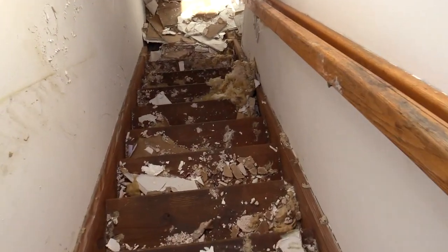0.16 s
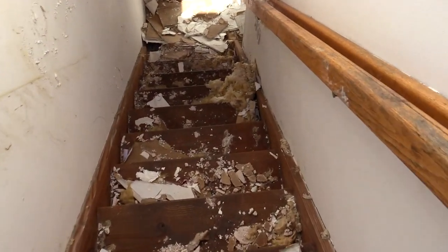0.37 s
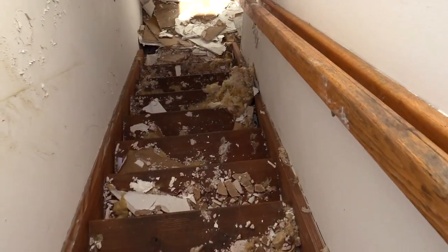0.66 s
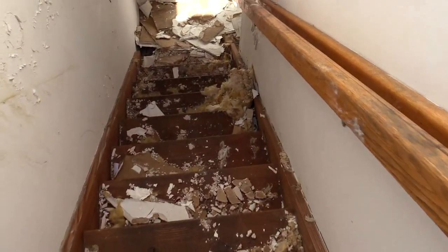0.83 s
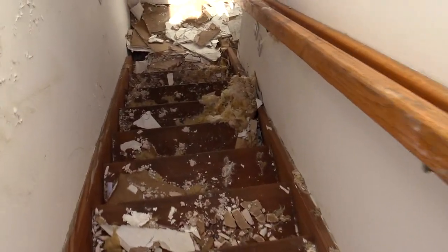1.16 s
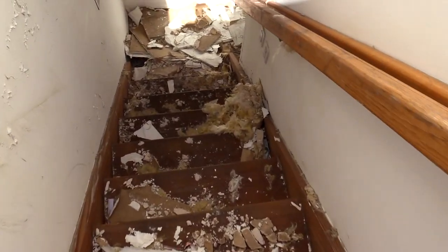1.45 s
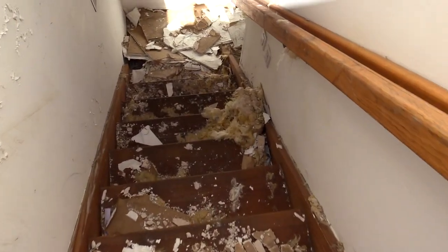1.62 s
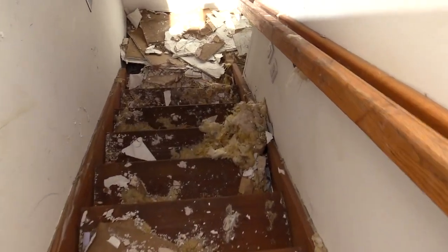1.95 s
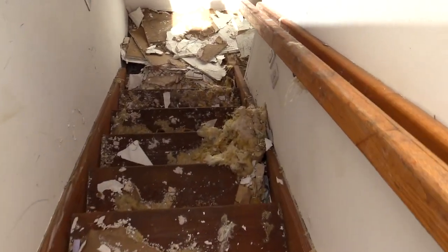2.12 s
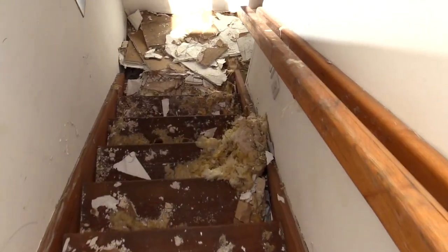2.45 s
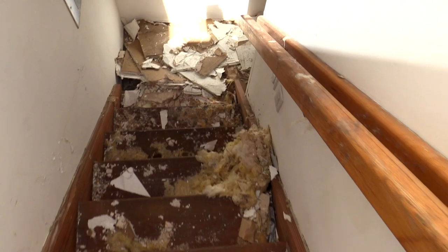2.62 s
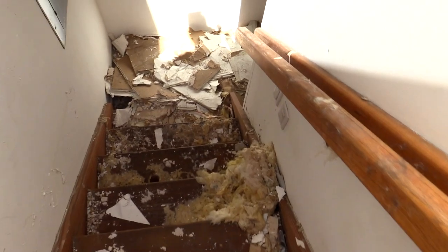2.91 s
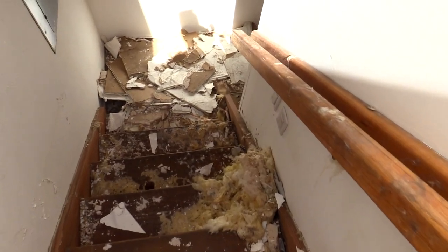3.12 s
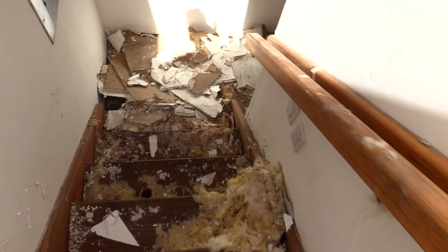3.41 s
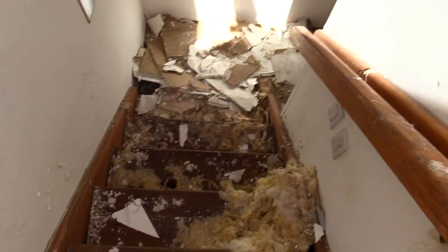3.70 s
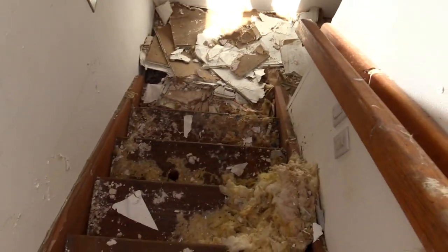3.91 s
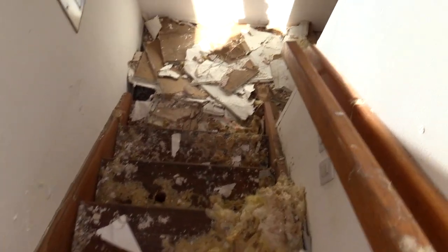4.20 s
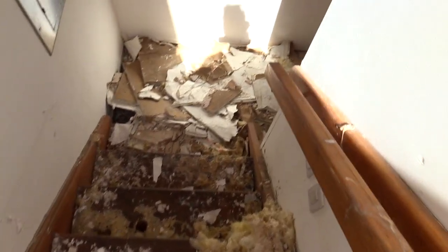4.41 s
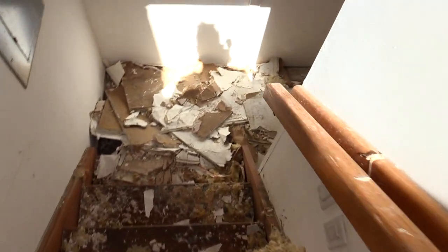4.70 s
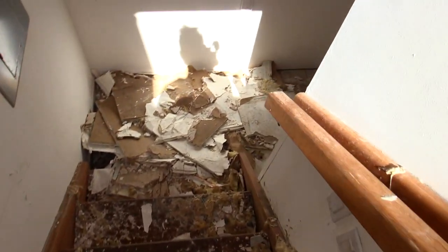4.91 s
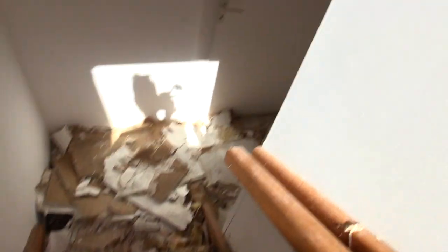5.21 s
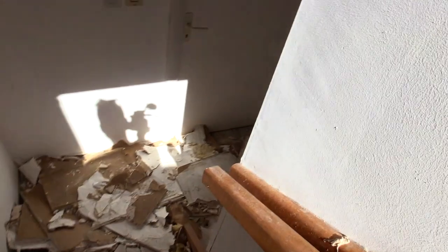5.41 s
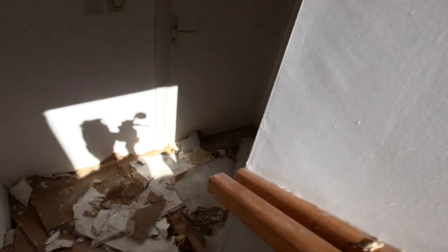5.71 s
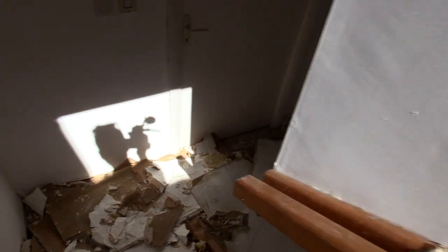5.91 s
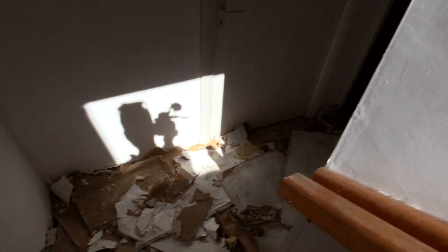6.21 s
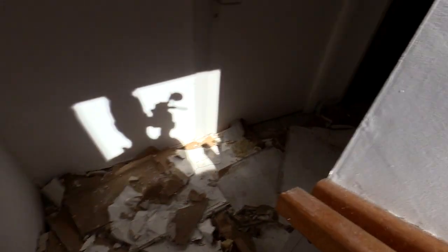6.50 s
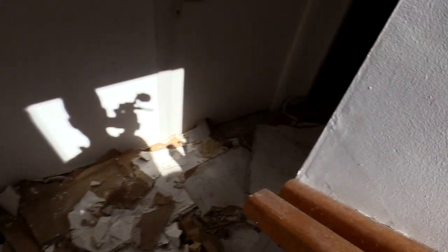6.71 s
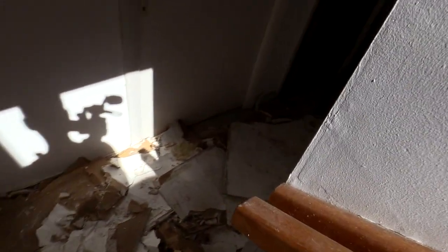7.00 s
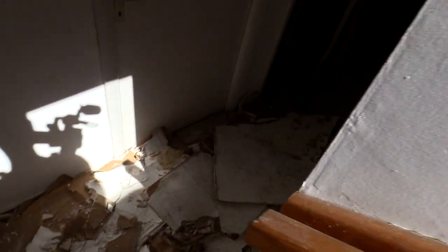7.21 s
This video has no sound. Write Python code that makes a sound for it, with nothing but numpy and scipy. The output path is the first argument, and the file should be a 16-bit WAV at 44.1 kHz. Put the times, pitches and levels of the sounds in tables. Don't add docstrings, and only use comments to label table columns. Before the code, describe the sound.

Someone treads along a wrecked wooden staircase, boards cracking sharply underfoot, crumbs crushing and shards clinking in a bare, echoing stairwell.

```python
import sys
import numpy as np
from scipy import signal
from scipy.io import wavfile
from scipy.ndimage import uniform_filter1d

SR = 44100
rng = np.random.default_rng(int(sys.argv[2]) if len(sys.argv) > 2 else 0)


def file_out(sig):
    cols = np.atleast_2d(sig).T
    lim = np.clip(cols, -1, 1)
    pcm = np.round(lim * 32767).astype(np.int16)
    wavfile.write(sys.argv[1], SR, pcm)


def decibels_to_gain(level_db):
    exponent = np.asarray(level_db, float) / 20
    return 10 ** exponent


N = 324135
STEP = 32

# frequency in Hz, level in dB per Hz.
TONE = [(35, -25), (60, -7.5), (121, -35.5), (168, 1), (371, -5), (448, -10.5), (636, -8), (682, -11.5),
        (1780, -21.5), (2470, -25.5), (11800, -37), (12700, -38.5), (16000, -35.5)]
TONE_DB = -56
# frequency in Hz, rms level in dB.
WHINES = [(4748, -86), (5216, -87), (5992, -85), (7434, -87), (8150, -89), (8931, -90), (11149, -88),
          (12947, -83), (13006, -82)]
WAVER = .0003

# time in seconds, level in dB.
DRAUGHT = [
    (0, -53),
    (1.2, -57),
    (2.5, -50),
    (3.0, -75),
    (3.6, -60.5),
    (5.001, -62),
    (7.35, -57),
]
# time in seconds, peak in dB, hold in seconds.
GUSTS = [(0, -27.5, 0.0089), (0.21, -30.5, .01), (0.365, -33.5, 0.0099), (.53, -40, 0.098),
         (0.704, -40, 0.14), (1.12, -37.5, 0.12), (1.98, -40.5, 0.055), (2.17, -43.5, 0.072),
         (2.546, -49.5, .06), (2.674, -42.5, .01), (3.204, -43, 0.078), (3.52, -46.5, 0.025),
         (4.861, -56, 0.14), (5.635, -54, .01), (5.759, -47, .01), (6.633, -56.5, 0.096)]
GUST_DB_PER_S, THUMP_FLOOR_DB = 160.5, -53.5
# time in seconds, peak in dB.
JOLTS = [(0.039, -28), (.4, -33), (0.528, -36), (.69, -36), (1.06, -29.5), (1.18, -35.5), (1.31, -40.5),
         (1.821, -33), (1.95, -33.5), (2.14, -36), (2.603, -33), (2.68, -32.5), (2.799, -25.5),
         (3.15, -35.5), (3.461, -35), (3.79, -48), (4.05, -43), (4.361, -37.5), (5.099, -46), (5.57, -40),
         (5.711, -48), (6.04, -35.5), (6.428, -42.5), (7.211, -40)]
JOLT_RISE_DB_PER_S, JOLT_FALL_DB_PER_S = 448.5, 219.5

# time in seconds, hold in seconds, level in dB, centre in Hz.
RUSTLES = [
    (1.552, 0.033, -73, 5800),
    (4.185, 0.066, -61.5, 2800),
    (4.69, .025, -52, 3370),
    (5.152, 0.017, -60.5, 5330),
    (5.77, 0.021, -72, 5500),
]

# frequency in Hz, t60 in seconds.
STAIRWELL = [(120, 0.58), (400, 0.49), (1000, 0.47), (2500, 0.38), (6000, 0.41), (12000, 0.29)]

# time of full weight in seconds, load in seconds,
# release in seconds, level in dB, fine dust in dB.
GRIND = [(0.413, 0.011, 0.1, -43.5, -6.5), (0.514, 0.0057, 0.059, -54, 13.5),
         (1.172, 0.041, 0.031, -46, 1.5), (1.304, 0.076, 0.034, -51.5, -5), (1.88, 0.02, 0.14, -43, 3.5),
         (2.036, 0.19, 0.037, -38.5, -23), (2.09, 0.059, 0.048, -62, 8.5), (2.774, 0.17, 0.047, -47.5, 1),
         (3.695, 0.047, 0.067, -51.5, -25), (3.95, 0.44, 0.45, -52, -10), (4.391, 0.0088, 0.037, -48, 0),
         (4.48, 0.08, 0.024, -52, -1), (4.703, 0.14, 0.034, -52.5, 3), (4.74, 0.024, 0.014, -42.5, -13),
         (5.15, 0.042, 0.044, -56, -5), (5.541, 0.033, 0.04, -50, -12), (6.12, 0.15, 0.24, -65, 3.5),
         (6.42, 0.23, 0.13, -47, -31), (6.924, 0.086, 0.26, -63, -3.5), (7.15, 0.1, .015, -57, -5)]
PRESS_DROP_DB = 20

# start in seconds, peak in dB, centre in Hz, t60 in seconds.
CRUMBS = [(1.064, -43, 3000, 0.044), (1.124, -46, 2200, .04), (1.14, -44, 7000, .02),
          (1.21, -54, 2500, 0.046), (1.31, -54, 2200, .04), (1.871, -39, 7800, .04),
          (1.879, -33, 5000, .03), (1.899, -32, 8500, .04), (1.905, -33, 7500, 0.046),
          (1.975, -42, 2000, .1), (2.045, -32.5, 1500, 0.13), (2.07, -40, 7900, 0.026),
          (2.653, -46, 2500, 0.099), (2.657, -53, 5200, .03), (2.671, -45, 4800, 0.056),
          (2.699, -34, 3020, 0.054), (2.718, -32.5, 6850, .03), (2.738, -46, 8000, .02),
          (2.758, -46, 9000, .02), (2.771, -38, 8000, .02), (2.791, -39, 7500, .02),
          (3.752, -41, 2000, 0.037), (3.82, -35, 1200, .05), (3.888, -38, 1300, 0.032),
          (3.929, -41, 3300, .05), (6.084, -46, 6800, 0.034), (6.196, -51, 3000, .03),
          (6.239, -38, 2980, 0.036), (6.317, -48, 5500, 0.043), (6.345, -46, 3000, .04),
          (6.372, -50, 5000, .04), (6.399, -53, 5000, .04), (6.417, -44, 2200, .03),
          (7.224, -30, 1470, 0.26), (7.311, -28.5, 2300, 0.033), (4.3747, -32.5, 5500, 0.039),
          (4.441, -41.5, 5000, .015), (4.4725, -45, 6000, 0.012), (4.786, -36, 1600, .03),
          (6.131, -46.5, 7010, 0.045), (6.25, -48, 3100, .2)]
CRUMB_WIDTH, CRUMB_RISE_S = 1.3, .0006

# start in seconds, peak in dB, tread pitch in Hz,
# knock of the upper wood modes in dB, ring t60 in seconds.
HEELS = [(0.213, -18.5, 157, -11, 0.018), (1.05, -16.5, 260, -8, 0.014), (1.824, -21, 170, -8, 0.078),
         (2.593, -16, 322, -16, 0.022), (2.797, -17, 104.5, 2.5, 0.089), (3.435, -16.5, 128, -11.5, 0.082),
         (4.031, -29, 175, -25.5, 0.022), (4.373, -29.5, 155, 6, 0.052), (4.622, -18, 114.3, -5.5, 0.078),
         (4.75, -19, 256, -12, 0.02), (5.538, -35.5, 97.6, -15.5, 0.055), (6.029, -28, 79.1, -22.5, 0.12),
         (6.33, -23, 195, 12, 0.039), (7.084, -25, 79.35, -14.5, 0.15), (7.177, -17.5, 354, 21.5, 0.16)]
# factor on the pitch, level in dB.
TREAD = [(1, 5), (1.55, -4.5), (2.3, -5), (3.1, -6), (4.4, -5), (6.3, -3), (9.0, -6)]
# frequency in Hz, level in dB, t60 in seconds.
STRINGER = [(307, -5, 0.035), (551, -17, 0.033), (744, -30.5, 0.0627)]

# start in seconds, peak in dB, pitch in Hz, t60 in seconds.
RINGS = [(0.222, -32, 336, 0.29), (0.4545, -13, 700, 0.028), (0.455, -10.5, 860, 0.026),
         (0.464, -28, 1050, 0.069), (1.058, -24.5, 734, 0.048), (1.066, -28, 453, 0.084),
         (1.174, -15.5, 744, 0.018), (1.874, -30, 4550, 0.033), (1.885, -29, 1896, 0.08),
         (1.902, -28, 5220, 0.026), (1.947, -22.5, 1497, 0.066), (2.597, -22.5, 252, 0.15),
         (2.803, -19, 557, 0.14), (2.804, -7, 1050, 0.025), (2.806, -33.5, 449, 0.091),
         (4.377, -33.5, 836, 0.082), (4.472, -38, 635, 0.049), (4.624, -23, 572, 0.036),
         (4.63, -30, 327, 0.24), (6.331, -36.5, 752, 0.098), (6.388, -30.5, 602, 0.063),
         (6.416, -34, 1090, 0.032), (7.181, -12, 828, 0.068), (7.186, -16.5, 543.6, 0.13),
         (7.235, -38, 3380, .1), (7.182, -7.5, 350, 0.082), (7.197, -15, 372, 0.061),
         (7.218, -25, 360, .11), (7.218, -15, 530, 0.074), (7.316, -22, 410, 0.026)]
# start in seconds, peak in dB, pitch in Hz, t60 in seconds.
CLINKS = [(0.0145, -21, 3770, 0.0058), (0.021, -38, 3380, 0.018), (0.021, -34, 2400, .02),
          (0.303, -33, 690, 0.043), (0.408, -40, 1310, .02), (0.435, -33, 1300, .02),
          (0.4545, -36, 2270, .03), (0.665, -18.5, 2450, 0.011), (0.666, -27, 2880, .012),
          (0.672, -26, 2490, 0.011), (0.681, -35, 2700, .012), (0.4545, -26, 3160, 0.018),
          (1.869, -31, 3800, .015), (1.87, -33, 7160, .012), (1.878, -37, 3720, .012),
          (1.898, -28, 7000, .01), (2.03, -20.5, 3510, 0.01), (2.8045, -5, 1560, 0.024),
          (3.532, -20.5, 1940, 0.023), (4.375, -35, 4520, 0.017), (6.329, -32.5, 2400, 0.014),
          (7.1795, -10, 2386, 0.024), (2.029, -34, 6340, 0.014), (2.093, -41, 3550, 0.014),
          (2.761, -28, 2950, .015), (2.8014, 2, 2840, 0.0082), (3.438, -41, 2820, 0.013),
          (3.725, -38, 2400, 0.014), (3.73, -35, 2470, 0.023), (3.796, -17, 1270, 0.019),
          (3.807, -27, 1010, 0.026), (3.84, -32, 3960, 0.012), (3.842, -33, 2280, .015),
          (3.864, -26, 1030, 0.036), (3.878, -37, 4000, .015), (3.922, -39, 3320, 0.036),
          (4.006, -27.5, 1360, .015), (4.008, -34.5, 2300, 0.014), (4.752, -21, 4400, 0.012),
          (4.752, -17, 2370, 0.018), (4.784, -30, 1126, .03), (7.1795, -5, 2753, 0.019),
          (7.1795, -7.5, 3640, 0.014)]
CLINK_T60_MAX = .024
RINGS_TO_WALLS_DB, CLINKS_TO_WALLS_DB = -5, -16

# start in seconds, peak in dB, pitch in Hz, body in dB.
SPLINTERS = [
    (2.071, -46, 1350, -22),
    (3.1574, -41, 2580, -10),
    (3.2029, -37, 3320, -13),
    (3.7937, -47, 1150, 26),
    (4.6634, -59, 3330, -13),
]
FLAKES = [(0.0141, -29, 2940, -6.5), (0.5077, -30, 1930, -12), (0.6644, -27.5, 2480, -1),
          (1.0625, -44, 1500, 11.5), (1.1037, -44, 1180, 4), (1.2003, -34, 1790, -9),
          (1.2987, -56, 1370, 13.5), (1.5494, -60, 1560, 9), (2.27, -54.5, 1410, 12.5),
          (2.3295, -45.5, 1610, 2), (3.1365, -48, 3250, -11), (3.9888, -43.5, 1230, 6),
          (5.77, -62.5, 1630, -1.5), (1.8981, -24.5, 1770, -4), (2.7137, -29, 2200, 2)]
CHIPS = [(0.388, -49, 1250, -13), (0.492, -37, 1210, -3), (0.9675, -48, 3100, -4), (1.8264, -39, 1540, -1),
         (2.2835, -50, 1630, -20), (2.6697, -42, 1420, 6.5), (2.6922, -31, 1600, -5),
         (3.1223, -48, 2210, -5), (3.8767, -34, 1250, 0), (4.0061, -38.5, 1250, 2), (4.4732, -48, 1210, 11),
         (4.6952, -35, 3400, 1), (5.3996, -52.5, 1330, 0)]
LUMPS = [(0.4074, -38, 1330, -2), (0.5139, -29.5, 1180, -8), (0.5204, -37, 1300, -8),
         (0.5484, -38, 2420, -2), (1.1571, -31, 2070, 3), (1.1719, -33, 1670, 4),
         (2.0284, -24.5, 1550, -1.5), (2.092, -41.5, 1670, 7.5), (3.7314, -35.5, 2300, 0),
         (3.841, -27.5, 2440, 0), (3.8629, -45, 1200, 15.5), (3.922, -37, 1780, 2), (4.071, -40, 3400, 0),
         (4.4428, -39.5, 1280, -5), (6.0817, -40, 1820, -5), (6.1309, -41.5, 1210, 10),
         (6.3335, -25, 2480, -17), (6.393, -30.5, 2280, 4)]
# brittle edge in dB, splitting t60 in seconds.
SPLINTER = (5.8, 0.019)
FLAKE = (-4.5, 0.012)
CHIP = (-8, 0.013)
LUMP = (-15, 0.014)
# start in seconds, peak in dB, pitch in Hz, body in dB, brittle edge in dB.
TEARS = [(0.3116, -42.5, 3700, -1.5, 0), (1.873, -34, 1800, -1, -13), (1.8852, -35, 1880, 6.5, -24),
         (2.761, -18.5, 2790, 1, -4.5), (3.437, -47.5, 1220, 15, -15), (3.5, -50, 1810, 0, -1),
         (4.374, -28, 1434, 1.5, -42), (6.234, -32, 1630, -5, -16), (6.3286, -27, 2050, 0.5, -17),
         (6.389, -44.5, 1230, 18.5, -37.5), (2.717, -33, 2900, -8.5, 4), (2.732, -37.5, 2323, -16.5, -8.5),
         (1.871, -34, 3400, -22, 1), (7.3085, -29.5, 1200, -10, 2), (7.3122, -23.5, 2940, -4, -35)]
TEAR_T60 = 0.029
# start in seconds, peak in dB, pitch in Hz, brittle edge in dB.
CREAKS = [
    (0.436, -47, 1520, -20),
    (1.139, -48, 5060, 5),
    (1.864, -42, 3600, -11),
    (4.369, -40, 3640, -5),
    (2.7895, -24, 2530, -19),
    (3.526, -41, 3040, -6),
    (7.15, -45, 3100, -4),
    (7.169, -38, 2970, -7.5),
    (7.174, -49, 2740, 6),
]
CREAK_BODY_DB, CREAK_T60 = -11, 0.022

# start in seconds, peak in dB, splitting t60 in seconds, share to the walls in dB.
SNAPS = [
    (0.4536, -6, 0.02, -2.5),
    (1.9456, -11.5, 0.026, -0.5),
    (2.8011, -1.5, 0.014, 0.5),
    (3.5301, -10.5, 0.019, 3.5),
    (4.7526, -14, 0.023, 5),
    (7.18, -13.5, 0.038, 11),
]
# frequency in Hz, level in dB per Hz.
BOARD_A = [(170, -4.5), (300, -11), (600, -7.5), (950, -3), (1210, -2.5), (1620, -14), (2200, -8.5),
           (2850, -19), (3160, -25), (5100, -38), (6710, -36.5), (15000, -59)]
BOARD_B = [(150, -57.5), (250, -14), (358, 2.5), (496, -8.5), (829, -8.5), (1320, 2.5), (1860, -2.5),
           (2200, -11), (3620, -6.5), (4080, -11), (7060, -20), (15000, -39)]
BOARD_C = [(150, -60), (250, -6.5), (550, -5.5), (858, -3), (1340, -9.5), (1560, -5), (2360, -8),
           (2850, -14.5), (3210, -8.5), (4440, -19), (7430, -24.5), (15000, -47)]
BOARD_D = [(150, -13), (340, 0), (761, -0.5), (984, -4), (1130, -3), (1360, -2), (1790, -4), (2240, -13),
           (3400, -10.5), (5200, -12), (15000, -46)]
BOARD_E = [(150, -41), (250, -23), (488, 6), (1170, 8), (1820, -1.5), (2480, -2), (3750, -9), (5550, -11.5),
           (15000, -35)]
BOARD_F = [(150, -8), (360, 5.5), (560, -14.5), (1150, -0.5), (1650, -22), (2080, -29), (2400, -8),
           (3300, 0), (3900, -9.5), (4500, -15), (6700, -15.5), (9000, -28.5), (15000, -39)]
BOARDS = BOARD_A, BOARD_B, BOARD_C, BOARD_D, BOARD_E, BOARD_F
# start in seconds, peak in dB, splitting t60 in seconds.
GIVES = [
    [(0.4534, -9, 0.0028), (0.4555, -12, 0.015)],
    [(1.945, -13, 0.006), (1.958, -21, 0.024)],
    [(2.8012, 0, 0.0022), (2.806, -8.5, 0.016)],
    [(3.53, -7.5, 0.0016)],
    [(4.752, -12, 0.0035)],
    [(7.1795, -2.5, 0.0077), (7.185, -4, 0.015), (7.199, -27, 0.0066)],
]
GIVES_TO_WALLS_DB = -10.5
RIPPLE_BINS = 24

PEAK_LIMIT = .97
EDGE_HZ = 15750


def evened(x):
    return x / np.sqrt(np.mean(x ** 2) + 1e-20)


def peaked(x):
    return x / (abs(np.atleast_2d(x)[0]).max() + 1e-12)


def read(points, hz):
    f, value = np.transpose(points)
    return np.interp(np.log(hz + 1), np.log(f + 1), value)


def add(mix, s, sound):
    part = mix[max(round(s * SR), 0):][:len(sound)]
    part += sound[:len(part)]


def band(x, lo_hz, hi_hz):
    return signal.sosfilt(signal.butter(2, [lo_hz, hi_hz], "band", fs=SR, output="sos"), x)


def swell(s, db, rise_db_per_s, fall_db_per_s, hold_s=0.):
    t = np.arange(0, N + STEP, STEP) / SR - s
    away = np.maximum(abs(t) - hold_s / 2, 0)
    return decibels_to_gain(db - away * np.where(t < 0, rise_db_per_s, fall_db_per_s))


def filled(control):
    return np.interp(np.arange(N) / STEP, np.arange(len(control)), control)


def ring(modes, length_s, rise_s):
    t = np.arange(round(length_s * SR)) / SR
    hz, db, t60 = np.transpose(modes)[:, :, None]
    tones = decibels_to_gain(db - 60 * t / t60) * np.sin(2 * np.pi * hz * t)
    return tones.sum(0) * (1 - np.exp(-t / rise_s))


def at_once(log_gain):
    return np.exp(np.conj(signal.hilbert(log_gain)))


def causal(points):
    hz = abs(np.fft.fftfreq(4096, 1 / SR))
    log_gain = np.log(decibels_to_gain(np.maximum(read(points, hz), -100)))
    return np.fft.ifft(at_once(log_gain)).real[:2048]


def levelled(burst):
    spectrum = np.fft.fft(burst, 4096)
    power = uniform_filter1d(abs(spectrum) ** 2, RIPPLE_BINS, mode="wrap")
    log_gain = -np.log(power + 1e-12) / 2
    flat = np.fft.ifft(spectrum * at_once(log_gain)).real[:len(burst)]
    return flat * np.linalg.norm(burst) / np.linalg.norm(flat)


def splitting(noise, t60, rise_s, hold_s=0.):
    t = np.arange(len(noise)) / SR
    decay = decibels_to_gain(-60 * np.maximum(t - hold_s, 0) / max(t60, .002))
    burst = noise * decay * (1 - np.exp(-t / rise_s))
    click = np.linalg.norm(burst) * (t == t[40])
    return np.array([levelled(burst), click])


def room_tone():
    frames, hz = N // 256 + 5, np.fft.rfftfreq(1024, 1 / SR)
    a, b, patches = rng.standard_normal((frames, 513, 3)).T
    patches = evened(uniform_filter1d(uniform_filter1d(patches, 14, 0), 20, 1))
    spectra = (a + 1j * b) * decibels_to_gain(read(TONE, hz)[:, None] + 2.0 * patches)
    tone = decibels_to_gain(TONE_DB + 2.0) * evened(signal.istft(spectra, nperseg=1024, noverlap=768)[1][:N])
    t = np.arange(N) / SR
    drift = np.cumsum(rng.standard_normal(N))
    for f, db in WHINES:
        wander = WAVER * (f / 4000) ** 4.3 * drift
        tone += np.sqrt(2) * decibels_to_gain(db) * np.sin(2 * np.pi * (f * t + rng.random()) + wander)
    return tone


def draught():
    gusts = sum(swell(s, db, GUST_DB_PER_S, GUST_DB_PER_S, hold_s) ** 2 for s, db, hold_s in GUSTS)
    jolts = sum(swell(s, db, JOLT_RISE_DB_PER_S, JOLT_FALL_DB_PER_S) ** 2 for s, db in JOLTS)
    air = decibels_to_gain(np.interp(np.arange(N) / SR, *np.transpose(DRAUGHT)))
    slow = evened(band(band(rng.standard_normal(N), 20, 55.1), 20, 55.1))
    thump = evened(band(band(rng.standard_normal(N), 52, 108.3), 52, 108.3))
    buffeting = np.sqrt(air ** 2 + filled(gusts)) * slow
    thumping = np.sqrt(decibels_to_gain(THUMP_FLOOR_DB) ** 2 + filled(jolts)) * thump
    return buffeting + decibels_to_gain(-5.0) * thumping


def rustle():
    hiss, out = rng.standard_normal(N), np.zeros(N)
    for s, hold_s, db, hz in RUSTLES:
        out += filled(swell(s, db, 500, 350, hold_s)) * evened(band(hiss, hz / 1.36, hz * 1.23))
    return out


def stairwell(x, build_s=0.0032, early_db=4.0, early_t60=0.18):
    taps = np.zeros((3, SR))
    at = np.arange(60, SR - 12, 12) + rng.integers(0, 12, (3, (SR - 61) // 12))
    np.put_along_axis(taps, at, rng.choice([-1., 1.], at.shape), 1)
    hz, times, spectra = signal.stft(taps, SR, nperseg=256)
    decay = decibels_to_gain(-60 * times / read(STAIRWELL, hz)[:, None])
    tails = signal.istft(spectra * decay, SR, nperseg=256)[1]
    t = np.arange(tails.shape[1]) / SR
    tails = tails * (1 - np.exp(-t / build_s)) * (1 + decibels_to_gain(early_db - 60 * t / early_t60))
    tails = tails / np.linalg.norm(tails[0])
    turn = np.pi * (np.arange(N) / SR * 3.1 + np.arange(3)[:, None] / 3)
    sent = x * np.cos(turn) * np.sqrt(2 / 3)
    return signal.fftconvolve(sent, tails, axes=1).sum(0)[:N]


def grind():
    size = decibels_to_gain(3.1 * np.minimum(rng.exponential(1, (3, N)), 4))
    struck = rng.random((3, N)) < 8000 / SR
    crumb, grains, specks = rng.standard_normal((3, N)) * size * struck
    coarse = evened(band(band(grains, 2100, 4000), 1170, 4600) + decibels_to_gain(5.5) * band(crumb, 554, 1800))
    dust = evened(band(specks, 2400, 7600))
    bunches = evened(band(rng.standard_normal(N), 28.4, 133))
    clumps = decibels_to_gain(1.5 * np.clip(bunches, -3, 1.4))
    weight = fine = 0
    for s, load_s, release_s, db, dust_db in GRIND:
        press = swell(s, db - 4, PRESS_DROP_DB / load_s, PRESS_DROP_DB / release_s)
        weight = weight + press
        fine = fine + press * decibels_to_gain(dust_db)
    return clumps * (filled(weight) * coarse + filled(fine) * dust)


def crumbs():
    out, t = np.zeros(N), np.arange(5000) / SR
    for s, db, hz, t60 in CRUMBS:
        burst = rng.standard_normal(len(t)) * decibels_to_gain(-60 * t / t60) * (1 - np.exp(-t / CRUMB_RISE_S))
        add(out, s, decibels_to_gain(db) * peaked(band(burst, hz / CRUMB_WIDTH, hz * CRUMB_WIDTH)))
    return out


def heels():
    out = np.zeros(N)
    for s, db, hz, knock_db, t60 in HEELS:
        modes = []
        for factor, mode_db in TREAD:
            knock = knock_db if hz * factor > 500 else 0
            modes.append((hz * factor * rng.uniform(.93, 1.07), mode_db + knock, t60 / factor ** .4))
        thud = ring(modes + STRINGER, .4, .001)
        add(out, s + .003, decibels_to_gain(db - 2) * peaked(thud))
    return out


def rings():
    out = np.zeros((N, 2))
    sorts = (RINGS, 1, RINGS_TO_WALLS_DB), (CLINKS, CLINK_T60_MAX, CLINKS_TO_WALLS_DB)
    for table, longest_s, walls_db in sorts:
        for s, db, hz, t60 in table:
            note = ring([(hz, db, min(t60, longest_s))], .4, 2.03 / hz)
            add(out, s, np.outer(note, decibels_to_gain([0, walls_db])))
    return out.T


def breaks():
    sorts = (SPLINTERS, SPLINTER), (FLAKES, FLAKE), (CHIPS, CHIP), (LUMPS, LUMP)
    rows = [row + shared for table, shared in sorts for row in table]
    rows += [row + (TEAR_T60,) for row in TEARS]
    creaks = [(s, db, hz, CREAK_BODY_DB, edge_db, CREAK_T60) for s, db, hz, edge_db in CREAKS]
    return sorted(rows) + creaks


def shards():
    out = np.zeros((N, 2))
    for s, db, hz, body_db, edge_db, t60 in breaks():
        noise = rng.standard_normal(3000)
        body = band(splitting(noise, 2.95 * t60, 0.00012), 280, 1330)
        crack = splitting(noise, t60, 0.00074)
        broad = band(band(band(crack, 784, 4000), 620, 4800), 300, 4400)
        middle = broad + 1.7 * band(crack, hz / 1.18, hz * 1.084)
        edge = band(band(splitting(noise, 0.12 * t60, 0.000354), 2500, 11000), 2180, 21000)
        shard = decibels_to_gain(body_db) * peaked(body) + peaked(middle) + decibels_to_gain(edge_db) * peaked(edge)
        add(out, s, decibels_to_gain(db) * shard.T)
    return out.T


def gives():
    out = np.zeros((N, 2))
    for rows, board in zip(GIVES, BOARDS):
        for s, db, t60 in rows:
            crack = splitting(rng.standard_normal(1500), t60, 0.00076)
            give = peaked(signal.oaconvolve(crack, causal(board)[None]))
            add(out, s, give.T * decibels_to_gain([db, db + GIVES_TO_WALLS_DB]))
    return out.T


def snaps():
    out = np.zeros((N, 2))
    for (s, db, t60, walls_db), board in zip(SNAPS, BOARDS):
        crack = splitting(rng.standard_normal(3000), t60, 0.000212, hold_s=0.0014)
        snap = peaked(signal.oaconvolve(crack, causal(board)[None]))
        add(out, s, snap.T * decibels_to_gain([db, db + walls_db]))
    return out.T


def scene():
    cracks, to_walls = band(shards() + snaps() + gives(), 140, 18000) + rings()
    grit = grind()
    wood = band(band(heels(), 62, 6000), 50, 9000)
    echoes = stairwell(decibels_to_gain(-5.0) * to_walls + decibels_to_gain(-11.0) * grit + decibels_to_gain(-1.5) * wood)
    background = draught() + room_tone() + rustle()
    return (background + echoes + grit + crumbs() + wood + cracks)[None]


def roll_off(x):
    return signal.sosfilt(signal.butter(12, 16470, fs=SR, output="sos"), x)


def record(dry):
    limited = np.clip(dry, -PEAK_LIMIT, PEAK_LIMIT)
    lowpass = signal.firwin(511, EDGE_HZ, window=("kaiser", 9), fs=SR)
    return roll_off(signal.oaconvolve(limited, lowpass[None], "same"))


dry = scene()
out = record(dry)
file_out(out)
```